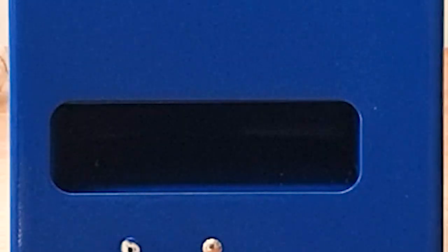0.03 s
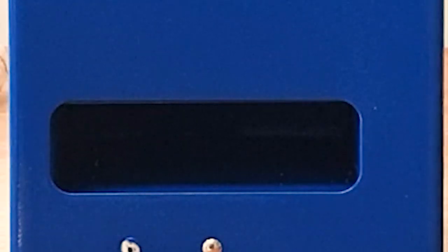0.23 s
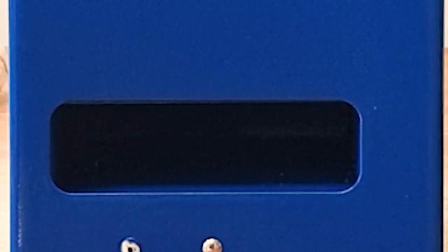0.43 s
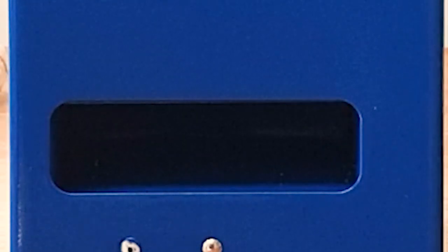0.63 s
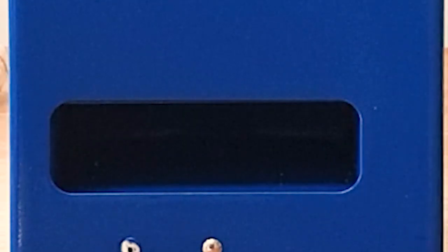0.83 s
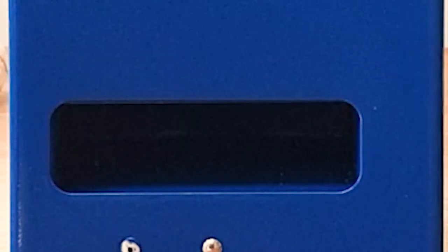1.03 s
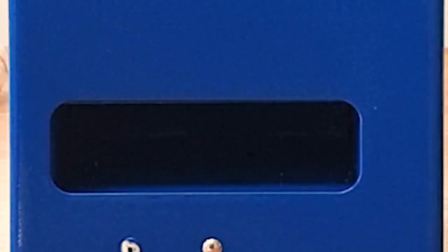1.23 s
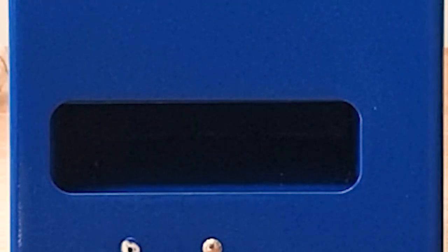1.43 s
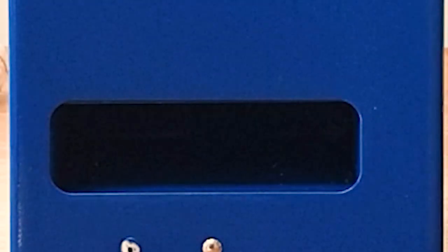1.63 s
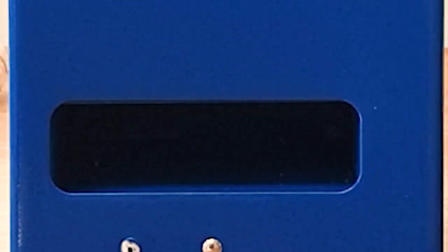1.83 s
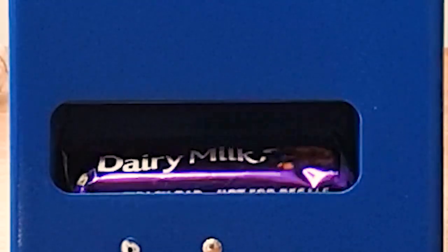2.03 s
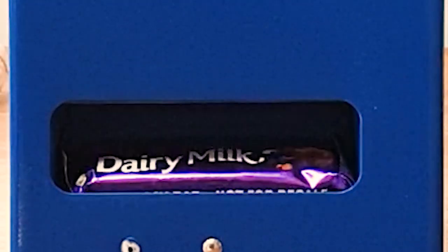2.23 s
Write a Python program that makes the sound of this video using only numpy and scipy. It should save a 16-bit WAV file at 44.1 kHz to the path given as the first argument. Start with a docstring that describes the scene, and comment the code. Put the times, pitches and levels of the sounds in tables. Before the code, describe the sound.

A metal ratchet clacks rapidly, then a chocolate bar drops into a vending machine tray.

```python
"""A quiet room, close to the hatch of a small vending machine.
Over a low hum, a dry pivot squeaks by stick-slip friction and the slide knocks, setting the cabinet
panels booming. A steel pawl clacks over six teeth, and the slide knocks home. A wrapped chocolate bar
scrapes along, drops down the chute and rattles into the ringing tray. Each impact is a burst of
decaying noise, joined by the damped normal modes of the parts it excites."""
import sys
import numpy as np
from scipy import signal
from scipy.fft import rfft, irfft, next_fast_len
from scipy.io import wavfile
from scipy.ndimage import map_coordinates

SR = 44100
rng = np.random.default_rng(int(sys.argv[2]) if len(sys.argv) > 2 else 0)


def to_wav(s):
    """Save 16-bit WAV."""
    ch = np.atleast_2d(s).T  # columns
    pcm = np.round(np.clip(ch, -1, 1) * 32767)  # PCM
    wavfile.write(sys.argv[1], SR, pcm.astype(np.int16))


N = 101429
T = np.arange(SR * 3 // 4) / SR  # time axis of one event, s


def amp(db):
    """Amplitude ratio of a level in decibels."""
    return 10 ** (np.asarray(db) / 20)


def along(points, hz):
    """Interpolation of (frequency, value) points on a logarithmic frequency axis."""
    knot_hz, values = np.transpose(points)
    return np.interp(np.log(hz + 1), np.log(knot_hz + 1), values)


def wobble(rate_hz, size):
    """Smooth random modulation: a spline through Gaussian values drawn at rate_hz."""
    return map_coordinates(rng.standard_normal(size // 8), [np.arange(size) * rate_hz / SR], mode="wrap")


def filtered(x, response):
    """Linear filtering: the spectrum is multiplied by a frequency response."""
    size = x.shape[-1]
    padded = next_fast_len(size + SR // 4)
    return irfft(rfft(x, padded) * response(np.fft.rfftfreq(padded, 1 / SR)), padded)[..., :size]


def dull(hz, cutoff_hz):
    """Low-pass response: a soft contact excites little above its cutoff."""
    return 1 / np.sqrt(1 + (hz / cutoff_hz) ** 5)


def add(out, start_s, sound):
    """Superposition: an event adds to the sound already present."""
    part = out[:, round(start_s * SR):][:, :len(T)]
    part += sound[..., :part.shape[1]]


# Likeness of the sound at the two ears: frequency_hz, correlation
COHERENCE = [(100, 0.96), (300, 0.97), (700, .7), (1400, 0.1), (3000, 0.095), (6000, 0.033), (14000, 0.02)]
def ear_angle(hz):
    """Interaural coherence as a mixing angle: high frequencies differ more between the ears."""
    return np.arccos(np.clip(along(COHERENCE, hz), -1, 1)) / 2


def noise(spectrum, size, grain_db=0, cutoff_hz=SR):
    """Partly coherent stereo noise of unit rms; a random gain on each sample makes it grainy."""
    white = rng.standard_normal((2, size)) * amp(grain_db * rng.uniform(-1, 1, size))
    colour = lambda hz: amp(along(spectrum, hz)) * dull(hz, cutoff_hz)
    split = lambda hz: np.array([np.cos(ear_angle(hz)), np.sin(ear_angle(hz))])
    mid, side = filtered(white, lambda hz: colour(hz) * split(hz))
    pair = np.array([mid + side, mid - side])
    return pair / np.sqrt(np.mean(pair ** 2) + 1e-20)


# Spectrum of the room's background: frequency_hz, level_db
ROOM_SPECTRUM = [(20, -22), (32, -10.5), (46, 0.5), (80, -10.5), (100, -7), (135, -16.5), (170, -11.5),
                 (200, 1), (230, -16), (270, -15), (470, -19), (750, -22), (1500, -33), (3000, -44),
                 (6000, -41.5), (9000, -56), (15000, -41)]
def room_hum(level_db=-55):
    """Ambient noise: low spectral peaks make a hum whose level wavers slightly."""
    return amp(level_db + 0.4 * wobble(7.82, N)) * noise(ROOM_SPECTRUM, N)


# Reverberation time inside the cabinet: frequency_hz, t60_s
CABINET_DECAY = [(200, 0.97), (700, 0.39), (2000, 0.34), (4500, 0.4), (8000, 0.37), (14000, 0.27)]
def cabinet_decay(x, t60_scale):
    """Reverberant decay: each frequency band dies exponentially at its own rate."""
    hz, t, bands = signal.stft(x, SR, nperseg=256)
    t60_s = t60_scale * along(CABINET_DECAY, hz)[:, None]
    return signal.istft(bands * amp(-60 * t / t60_s), SR, nperseg=256)[1][:, :len(T)]


# Squeaks of the dry pivot: start_s, length_s, pitch_hz, level_db, overtone_step_db
PIVOT_SQUEAKS = [(0.185, 0.022, 1238, -37.5, -19), (0.196, 0.0098, 2748, -24, -16.5),
                 (.199, 0.022, 2792, -34, -10), (.2, .014, 2970, -33, -31.5)]
def pivot(waver=0.012, echo_db=3.5, echo_cutoff_hz=3960):
    """Stick-slip friction: brief harmonic tones of wavering pitch reverberate in the cabinet."""
    out = np.zeros((2, N))
    for start_s, length_s, pitch_hz, level_db, overtone_step_db in PIVOT_SQUEAKS:
        phase = 2 * np.pi * np.cumsum(pitch_hz * (1 + waver * wobble(380, len(T)))) / SR
        tone = sum(amp(overtone_step_db * k) * np.sin((k + 1) * phase) for k in range(3))
        tone *= np.sin(np.pi * np.clip(T / length_s, 0, 1))
        response = cabinet_decay(noise([(100, 0.007), (16000, 0.0054)], len(T)), t60_scale=1.2)
        response /= np.linalg.norm(response[0])
        echo = signal.fftconvolve(tone[None], response, axes=1)[:, :len(T)]
        echo = filtered(echo, lambda hz: dull(hz, echo_cutoff_hz))
        add(out, start_s, amp(level_db) * np.sqrt(2) * (tone + amp(echo_db) * echo))
    return out


def strike(x, crack, crack_s, attack_s, t60_scale=1, chatter_db=2, chatter_s=0.025):
    """Impact transient: noise is shaped into a chattering crack, then dense echoes in the cabinet."""
    chatter = amp(chatter_db * wobble(495, len(T)) * np.exp(-T / chatter_s))
    onset = (1 + crack * np.exp(-T / crack_s)) * (1 - np.exp(-T / attack_s))
    return chatter * onset * cabinet_decay(x, t60_scale)


def ring(modes, cutoff_hz, attack_s, twin_db=-5):
    """Damped normal modes: each wavers in phase and beats with a weaker, slightly detuned twin."""
    out = np.zeros((2, len(T)))
    for hz, level_db, t60_s in modes:
        ear_phase = ear_angle(hz) * rng.choice([-1, 1]) * np.array([[1], [-1]])
        phase = 2 * np.pi * (hz * T + rng.random())
        phase += 0.6 * np.minimum(hz / 900, 1) * wobble(60, len(T))
        detune_hz = 17 * np.sqrt(hz / 1000) * rng.uniform(-2, 2)
        beat_phase = 2 * np.pi * (detune_hz * T + rng.random())
        twin = amp(twin_db) * np.sin(phase + beat_phase - ear_phase)
        doublet = (np.sin(phase + ear_phase) + twin) / np.hypot(1, amp(twin_db))
        envelope = amp(level_db + rng.normal(0, 1.3) - 60 * T / t60_s)
        out += envelope * dull(hz, cutoff_hz) ** 2 * doublet
    return out * (1 - np.exp(-T / attack_s))


# Knocks of the slide: start_s, level_db, cutoff_hz, boom_gain_db
SLIDE_KNOCKS = [(0.198, -38, 3700, -32.5), (0.22, -34, 1850, -28.5), (0.233, -39.5, 9700, -37.5),
                (0.841, -37.5, 7440, -44.5), (0.94, -35, 1850, -43.5), (0.9872, -28.5, 8940, -50),
                (1.022, -34.5, 3960, -71.5), (1.033, -43.5, 1836, -53), (1.1141, -37, 5970, -50)]
# Spectrum of a knock: frequency_hz, level_db
SLIDE_SPECTRUM = [(150, -35.5), (250, -16), (629, -6.5), (788, -9), (1310, -2.5), (1640, -6), (2160, -2),
                  (3230, -4), (3770, 1), (4990, -5), (7060, -7), (9010, -16), (12500, -1.5), (16000, -15)]
# Modes of the mechanism's frame, which the pawl also excites: pitch_hz, level_db, t60_s
FRAME_MODES = [(533, -6.5, 0.54), (700.5, -7.5, 0.23), (820, 3.5, 0.46), (973, -17.5, .35),
               (1145, 2.5, 0.41), (1252, 6.5, 0.14), (2010, 2.5, 0.13), (2136, -2.5, 0.4),
               (2890, -17.5, .3), (3359, -9, 0.57), (3530, -17.5, 0.14), (3846, -7, .38), (4140, 8.5, 0.22),
               (5750, 6, .3)]
def slide(frame_db=-17):
    """Impact excitation: at either end of its travel the slide knocks dully and rings the frame."""
    out = np.zeros((2, N))
    for start_s, level_db, cutoff_hz, boom_gain_db in SLIDE_KNOCKS:
        burst = noise(SLIDE_SPECTRUM, len(T), grain_db=10.5, cutoff_hz=cutoff_hz)
        knock = strike(burst, crack=0.2, crack_s=0.011, attack_s=0.0018)
        knock += amp(frame_db) * ring(FRAME_MODES, cutoff_hz, attack_s=0.00093)
        add(out, start_s, amp(level_db) * knock + amp(boom_gain_db) * panel_boom())
    return out


# Modes of the cabinet's panels: pitch_hz, relative_level_db, t60_s
PANEL_MODES = [(150, -6, .2), (179, 0, .24), (198, -6, .22), (238, -8, .2), (280, -14, .2)]
def panel_boom():
    """Panel resonance: the cabinet's low modes swell and die after a blow."""
    return ring(PANEL_MODES, cutoff_hz=900, attack_s=0.016) * amp(6.5)


# Clacks of the pawl, one for each tooth: start_s, steel_db, housing_db, boom_gain_db
PAWL_CLACKS = [(0.3765, -17.5, -24.5, -39), (.4765, -18.5, -27.5, -39), (.571, -20.5, -26, -32.5),
               (0.627, -20, -26.5, -69), (.672, -21, -25.5, -36), (0.7356, -21, -26, -34)]
# Spectrum of the struck steel: frequency_hz, level_db
STEEL_SPECTRUM = [(5180, -37), (8800, -29.5), (9930, -10), (10100, -11.5), (10800, -5.5), (13300, -3),
                  (14900, -3), (15600, -12), (16300, -6)]
# Modes of the steel pawl: pitch_hz, level_db, t60_s
PAWL_MODES = [(10422, -4, .3), (10944, -5, .28), (11623, -2, .28), (11962, -3, .25), (12290, -1, .25),
              (12430, -2, .22), (13081, -3, .28), (13417, 1, .28), (13660, -1, .28), (14180, -3, .28),
              (14303, -2, .3), (15122, -5, .25)]
# Spectrum of the struck housing: frequency_hz, level_db
HOUSING_SPECTRUM = [(120, -18), (200, -10.5), (407, -6.5), (544, -4.5), (717, -10), (815, -4.5),
                    (1010, -2.5), (1390, -7.5), (2490, -5), (3070, -6), (3380, -4.5), (4820, -9.5),
                    (5490, -5.5), (8760, -12), (9500, -22), (12400, -51), (20900, -120)]
def ratchet(pawl_db=-9, frame_db=-17):
    """Free vibration: the pawl snaps off each tooth, ringing brightly over the housing and frame."""
    out = np.zeros((2, N))
    for start_s, steel_db, housing_db, boom_gain_db in PAWL_CLACKS:
        steel = noise(STEEL_SPECTRUM, len(T), grain_db=7.5)
        steel = strike(steel, crack=0.74, crack_s=0.021, attack_s=0.00071)
        steel += amp(pawl_db) * ring(PAWL_MODES, cutoff_hz=24000, attack_s=0.00079)
        housing = noise(HOUSING_SPECTRUM, len(T), grain_db=15)
        housing = strike(housing, crack=0.17, crack_s=0.018, attack_s=0.00024)
        housing += amp(frame_db) * ring(FRAME_MODES, cutoff_hz=8100, attack_s=0.0032)
        clack = amp(steel_db) * steel + amp(housing_db) * housing
        add(out, start_s, clack + amp(boom_gain_db) * panel_boom())
    return out


# Soft bumps of the bar against the cabinet: start_s, boom_gain_db
BAR_BUMPS = [(1.16, -73), (1.367, -52), (1.416, -45), (1.852, -61), (1.938, -48.5), (2.03, -43.5)]
# Faint scrapes of the bar: start_s, level_db
BAR_SCRAPES = [(1.346, -61), (1.413, -61), (1.474, -61), (1.524, -62.5), (1.556, -65)]
# Spectrum of a scrape: frequency_hz, level_db
SCRAPE_SPECTRUM = [(530, -26), (900, 0.5), (1220, -12.5), (1850, -10.5), (2540, -28), (3680, -3.5),
                   (8350, -33.5), (12000, -39), (16000, -36.5)]
def bar_shifting():
    """Sliding friction: the bar scrapes in short bursts of noise, and its bumps excite the panels."""
    out = np.zeros((2, N))
    for start_s, level_db in BAR_SCRAPES:
        friction = noise(SCRAPE_SPECTRUM, len(T), grain_db=7)
        scrape = strike(friction, crack=0.28, crack_s=0.0089, attack_s=0.0025, t60_scale=0.82)
        add(out, start_s, amp(level_db) * scrape)
    for start_s, boom_gain_db in BAR_BUMPS:
        add(out, start_s, amp(boom_gain_db) * panel_boom())
    return out


# Contacts with chute and tray, before the loss through the hatch:
# start_s, impact_db, tray_db, tray_cutoff_hz, wrapper_db
BAR_LANDINGS = [(1.7715, -46, -49, 900, -46), (1.789, -40, -40, 845, -37.5), (1.8395, -40, -34, 856, -37),
                (1.85, -38, -28, 830, -36), (1.861, -35, -30.5, 850, -37.5),
                (1.913, -25.5, -36, 2830, -27.5), (1.928, -42, -33, 4630, -59),
                (1.9575, -31.5, -42.5, 3000, -35), (2.033, -36.5, -39, 1510, -46.5),
                (2.26, -54, -64, 2030, -63.5)]
# Spectrum of the bar's impact: frequency_hz, level_db
IMPACT_SPECTRUM = [(76, -62), (130, -16.5), (450, -8.5), (641, -15), (807, 0), (1370, 1), (1580, -3.5),
                   (1960, -4), (3220, -5.5), (9000, -30), (11700, -54), (19800, -120)]
# Spectrum of the crinkling wrapper: frequency_hz, level_db
WRAPPER_SPECTRUM = [(1500, -23), (3500, -5), (6000, 0), (8500, -12.5), (12500, -3), (15500, -8)]
# Modes of the tray: pitch_hz, level_db, t60_s
TRAY_MODES = [(330, -14, 1.1), (452, -8, .7), (495, -14, 1.1), (545, -5, .6), (623, 1.5, .45),
              (714, 0, .72), (813, 0, .6), (904, -11, .45), (1222, -6, .35), (1545, 2, .4), (1605, 7, .46),
              (1688, 4, .48), (2622, -7, .3), (3330, 1, .3)]
def bar_landing(snap_db=5.5, snap_s=0.0016, hatch_db=-2):
    """Inelastic collision: each landing thuds, crinkles the wrapper and excites the tray's modes."""
    out = np.zeros((2, N))
    for start_s, impact_db, tray_db, tray_cutoff_hz, wrapper_db in BAR_LANDINGS:
        burst = noise(IMPACT_SPECTRUM, len(T), grain_db=9)
        thud = strike(burst, crack=1.35, crack_s=0.0017, attack_s=0.00055)
        foil = noise(WRAPPER_SPECTRUM, len(T), grain_db=6) * amp(2.2 * wobble(350, len(T)))
        crinkle = strike(foil, crack=0.53, crack_s=0.0068, attack_s=0.0004)
        tray = ring(TRAY_MODES, tray_cutoff_hz, attack_s=0.0046)
        direct_snap = amp(snap_db) * np.exp(-T / snap_s) * noise(IMPACT_SPECTRUM, len(T), grain_db=4)
        landing = amp(impact_db) * (thud + direct_snap) + amp(wrapper_db) * crinkle + amp(tray_db) * tray
        add(out, start_s, amp(hatch_db) * landing)
    return out


def scene():
    """Superposition of the mechanism, the bar and the low hum of the room."""
    return pivot() + ratchet() + slide() + bar_shifting() + bar_landing() + room_hum()


# Level difference between the channels: frequency_hz, left_minus_right_db
CHANNEL_BALANCE = [(100, -1.4), (1500, -0.8), (5500, -1.4), (10000, -1), (13500, 1.3)]
def record(dry, top_hz=15850):
    """Frequency response: two microphones differ slightly in colour and share a steep band limit."""
    balance = lambda hz: amp(along(CHANNEL_BALANCE, hz) * np.array([[0.5], [-0.5]]))
    band_limit = lambda hz: 1 / (1 + (hz / top_hz) ** 150)
    return filtered(dry, lambda hz: balance(hz) * band_limit(hz))


dry = scene()
out = record(dry)
to_wav(out)
```